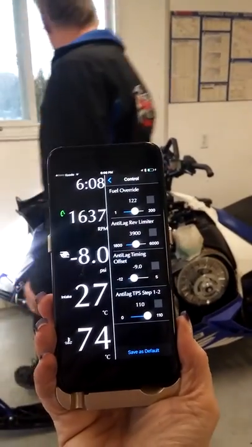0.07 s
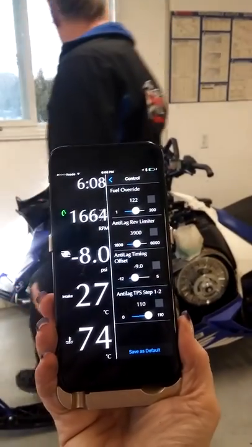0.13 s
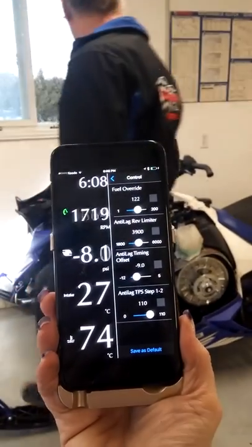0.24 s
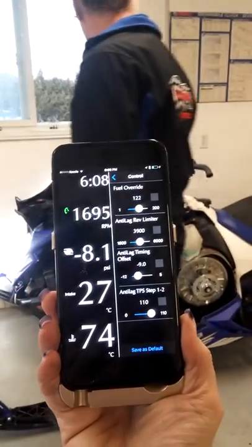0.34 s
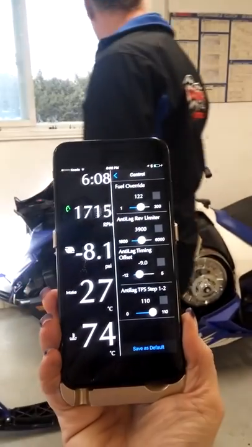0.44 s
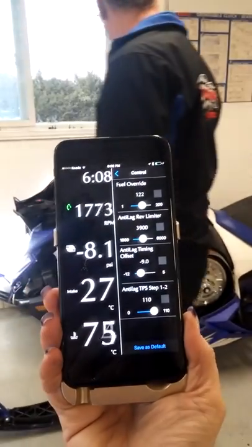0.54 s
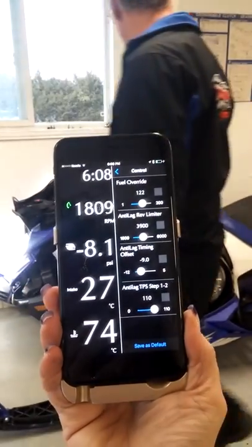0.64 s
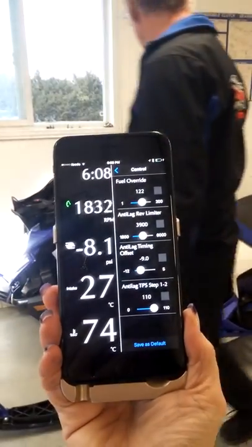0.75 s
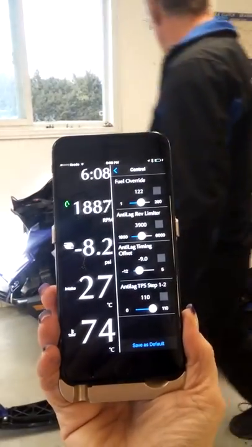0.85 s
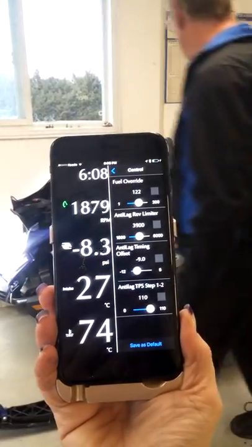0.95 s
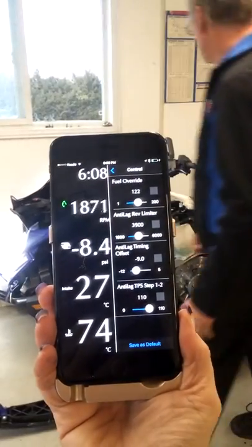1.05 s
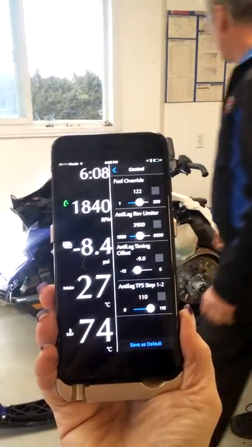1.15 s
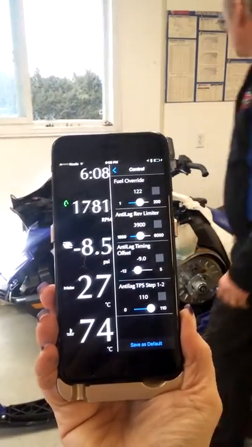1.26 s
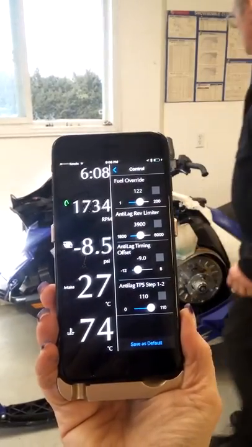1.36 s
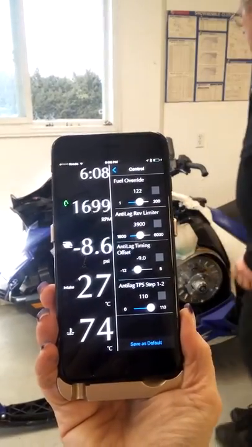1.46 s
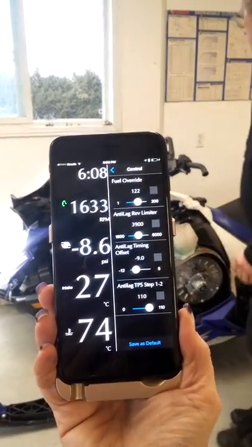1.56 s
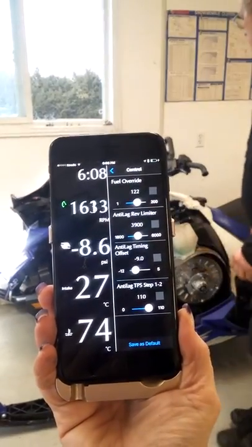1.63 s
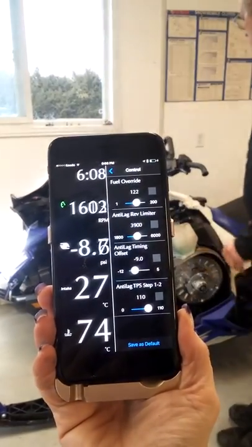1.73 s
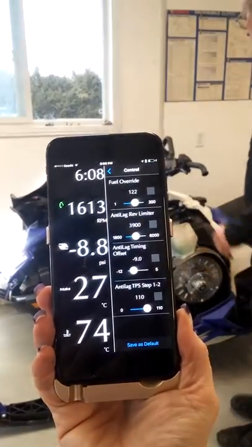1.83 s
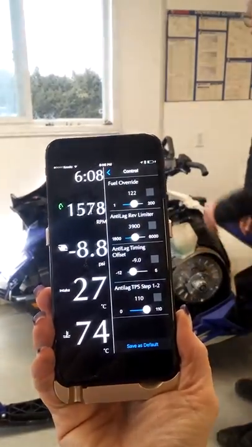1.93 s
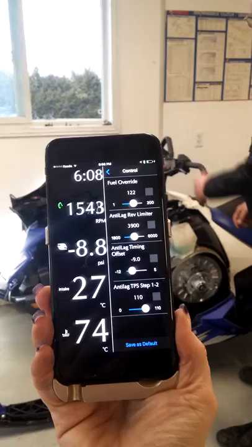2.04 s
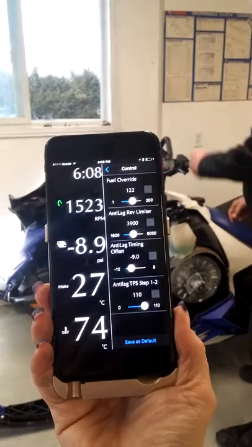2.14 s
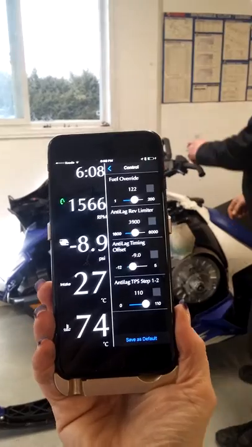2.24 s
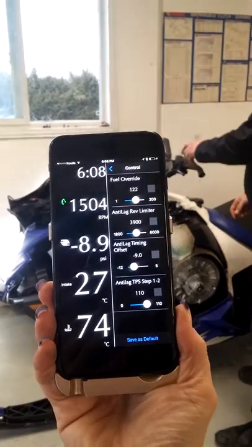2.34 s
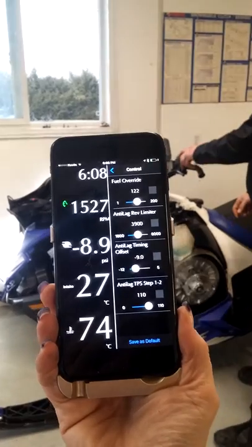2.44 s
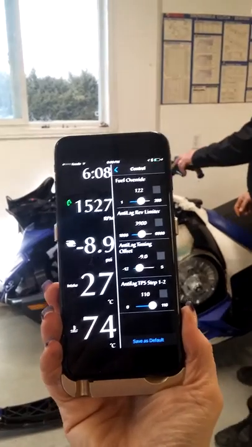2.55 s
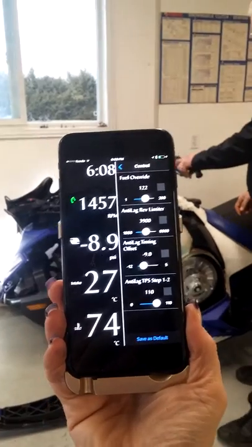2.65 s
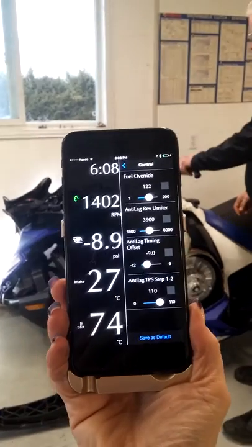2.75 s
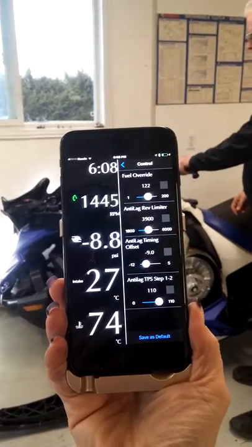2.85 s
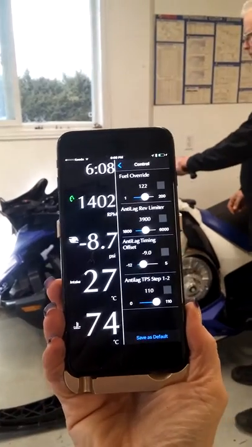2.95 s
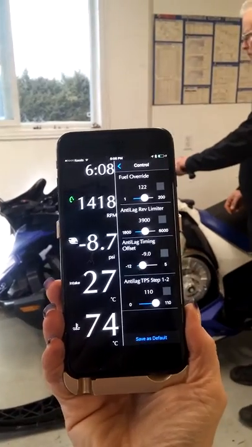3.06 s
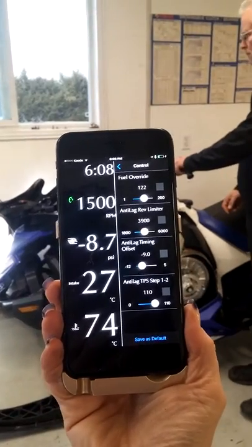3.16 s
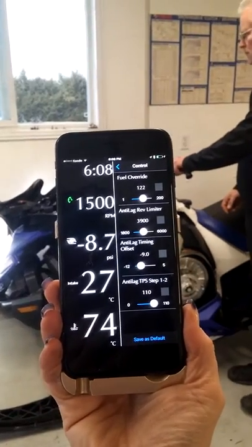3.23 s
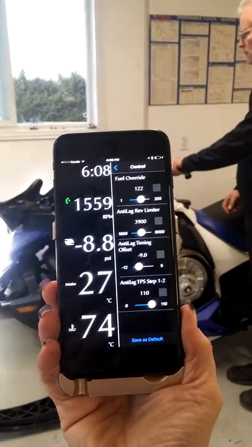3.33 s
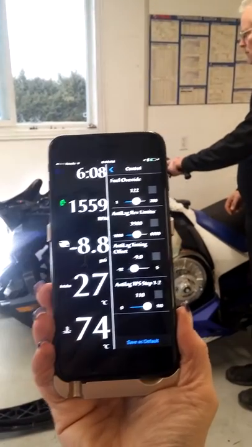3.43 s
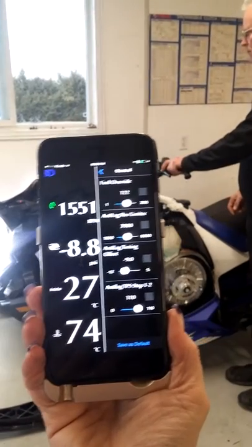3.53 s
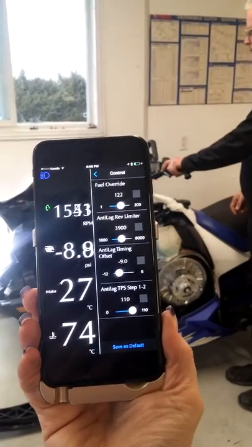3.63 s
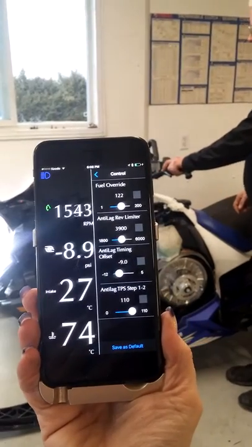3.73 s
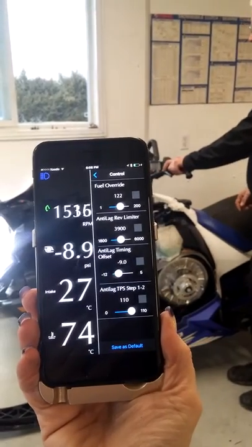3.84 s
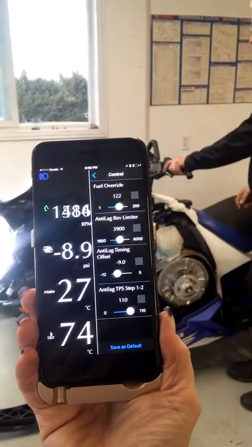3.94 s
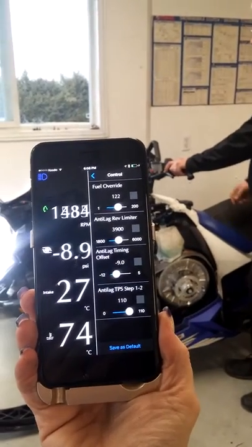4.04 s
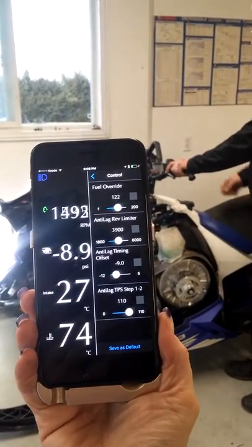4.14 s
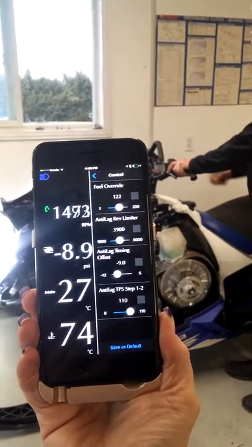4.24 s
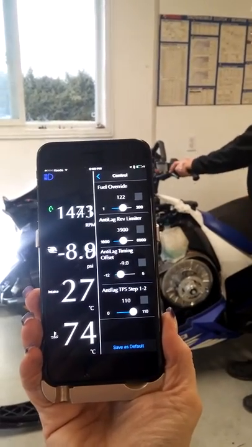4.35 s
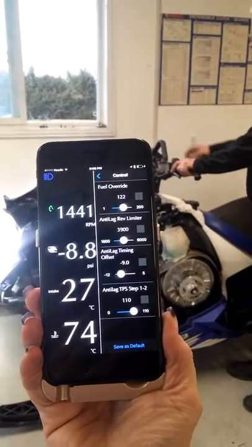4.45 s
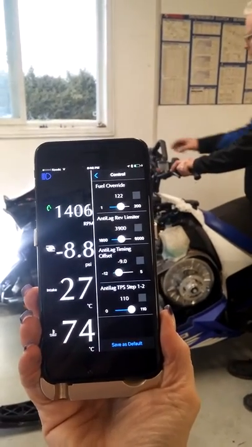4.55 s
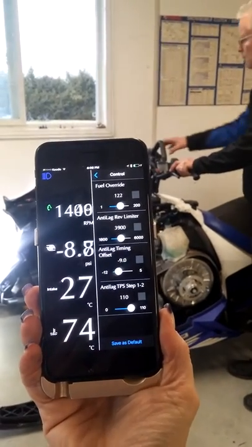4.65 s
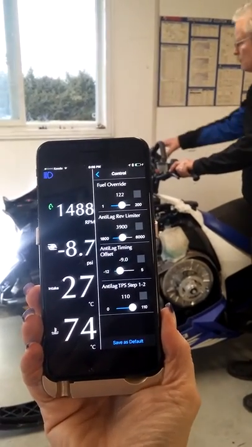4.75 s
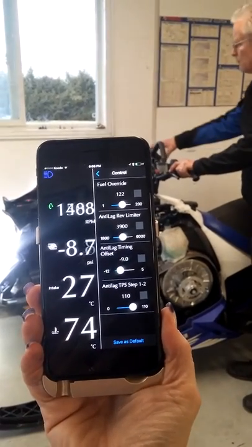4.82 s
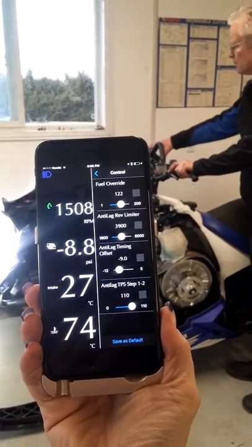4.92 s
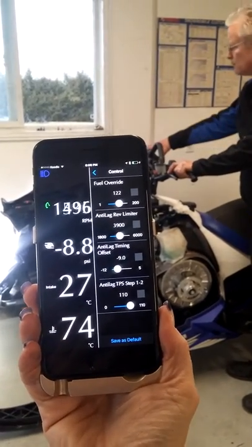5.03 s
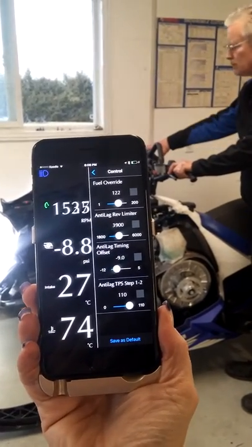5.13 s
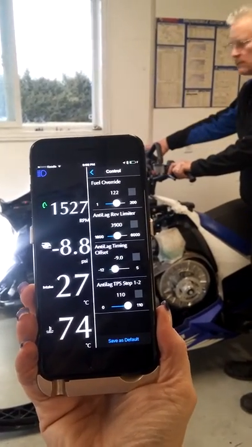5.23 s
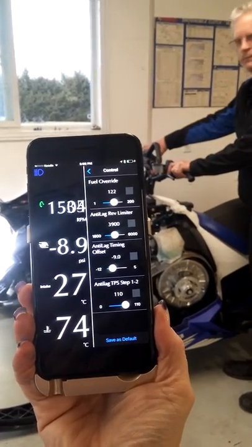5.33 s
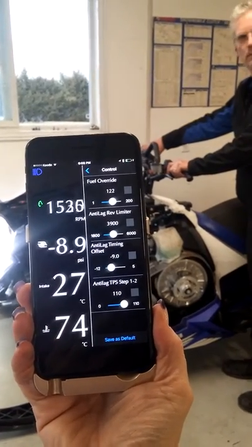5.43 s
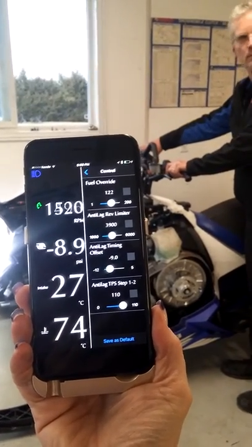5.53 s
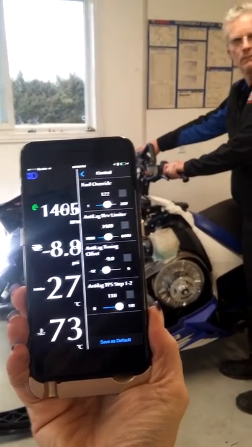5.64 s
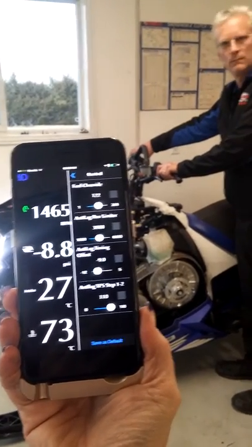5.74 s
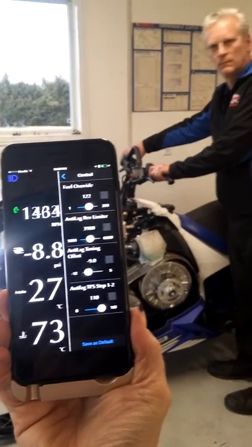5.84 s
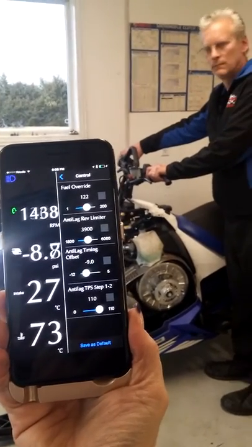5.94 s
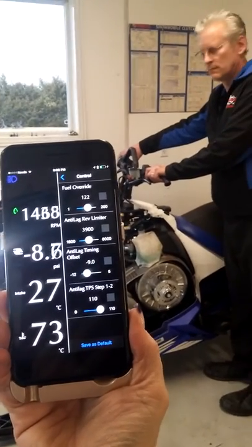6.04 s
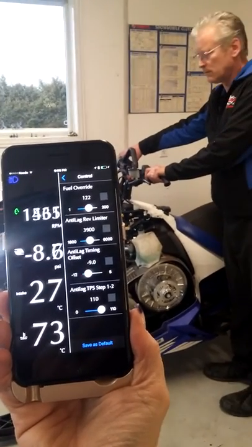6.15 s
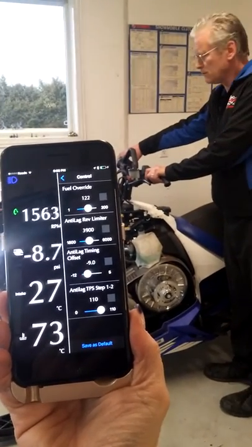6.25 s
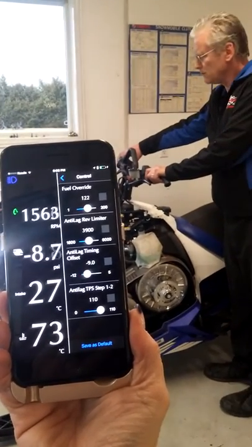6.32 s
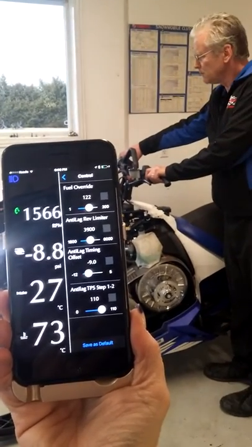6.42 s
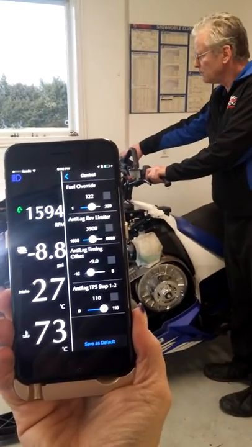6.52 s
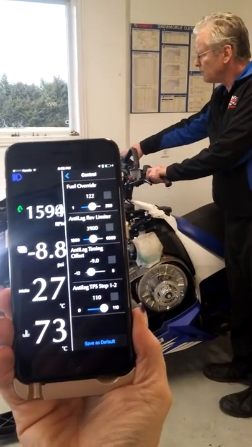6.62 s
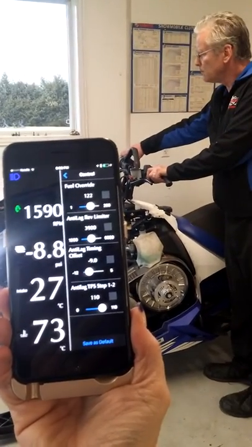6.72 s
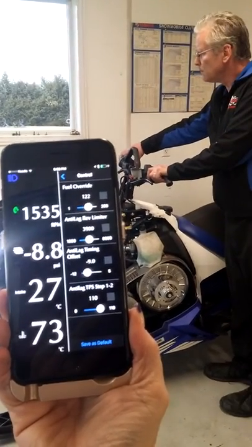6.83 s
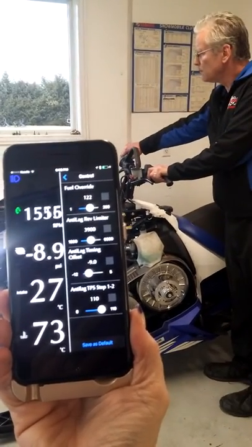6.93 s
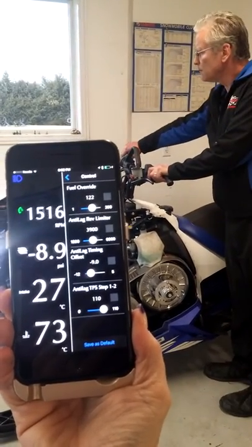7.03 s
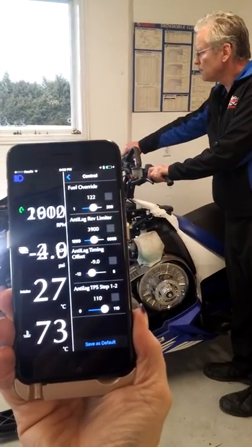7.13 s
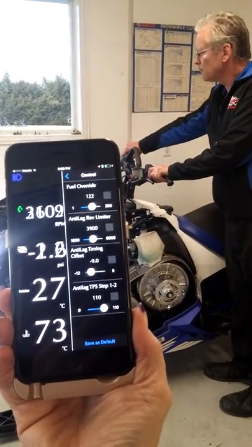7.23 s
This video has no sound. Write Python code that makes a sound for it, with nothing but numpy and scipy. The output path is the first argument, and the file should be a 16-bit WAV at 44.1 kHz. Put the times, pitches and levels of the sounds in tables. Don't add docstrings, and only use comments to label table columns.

```python
import sys
import numpy as np
from scipy import signal
from scipy.fft import rfft, irfft
from scipy.io import wavfile

SR = 44100
rng = np.random.default_rng(int(sys.argv[2]) if len(sys.argv) > 2 else 0)


def persist_wave(psi):
    counts = np.round(np.clip(psi, -1, 1) * 32767).astype(np.int16)
    wavfile.write(sys.argv[1], SR, np.atleast_2d(counts).T)


def how_loud(loudness_db):
    steps = np.asarray(loudness_db, float) / 20
    return 10 ** steps


N = 321048

# [t/s, level/dB]
PULSE_STRENGTH = [(0.0, -12), (0.5, -12), (0.95, -14), (1.2, -16), (1.45, -19), (2.1, -19), (2.4, -19.5),
                  (4.9, -20), (6.3, -20), (6.6, -21), (6.97, -19.5)]
CYLINDERS_DB = [0, .45, -.4]
# [t/s, f/Hz]
GOVERNOR_AIM = [(0.0, 41.06), (0.4, 42.83), (0.9, 47.0), (1.06, 46.84), (1.66, 40.04), (1.9, 39.87),
                (2.12, 38.28), (2.5, 38.22), (3.4, 38.87), (4.0, 37.8), (4.9, 37.6), (5.15, 38.16),
                (5.6, 37.98), (6.25, 38.92), (6.6, 39.98), (6.78, 38.8), (6.97, 38.4)]
# [f/Hz, level/dB]
BALANCE = [(60, 1.5), (110, 0.5), (200, 0.5), (380, -0.5), (700, 2), (1290, 1), (2380, -1.5), (4400, 1),
           (8120, -11), (15000, 3)]


def evened(x):
    return x / np.sqrt(np.mean(x ** 2) + 1e-20)


def read(points, hz):
    f, value = np.transpose(points)
    return np.interp(np.log(hz + 1), np.log(f + 1), value)


def curve(rows, t):
    s, *columns = np.transpose(rows)
    return [np.interp(t, s, c) for c in columns]


def bumps(modes, hz):
    return sum(db / (1 + (2 * (hz - f) / width) ** 2) for f, width, db in modes)


def causal(db, size=32768):
    log_gain = np.log(how_loud(np.maximum(db, -100)))
    full = np.concatenate([log_gain, log_gain[-2:0:-1]])
    return np.fft.ifft(np.exp(np.conj(signal.hilbert(full)))).real[:size]


def drift(rate_hz):
    t = np.arange(N) / SR
    coarse = t[::64]
    f = np.geomspace(rate_hz / 3, rate_hz, num=24)[:, None]
    waves = np.sin(2 * np.pi * (f * coarse + rng.random((24, 1)))) / np.sqrt(f)
    return np.interp(t, coarse, evened(waves.sum(0)))


def noise(db, size):
    # [f/Hz, correlation]
    likeness = [(60, .99), (300, 0.45), (500, 0.36), (650, 0.48), (1500, 0.4), (3200, 0.28), (4500, 0.067),
                (8000, 0.33), (15000, 0.14)]
    # [f/Hz, phase/rad]
    left_lead = [(0, -11.5), (520, -0.0), (1550, -2.5), (3190, 3.5), (3620, -2.5), (4390, 6), (5680, -4),
                 (6720, -2), (8010, -66.5), (8960, -17), (10300, -27.5), (12800, -28), (14300, -49),
                 (15200, -53.6)]
    frames, hz = N * 4 // size + 8, np.fft.rfftfreq(size, 1 / SR)
    a, b, c, d = rng.standard_normal((frames, len(hz), 4)).T
    same = np.clip(read(likeness, hz), -1, 1)[:, None]
    left = a + 1j * b
    delayed = left * np.exp(-1j * read(left_lead, hz))[:, None]
    z = np.array([left, same * delayed + np.sqrt(1 - same ** 2) * (c + 1j * d)])
    z *= how_loud(db(hz) + np.outer([.5, -.5], read(BALANCE, hz)))[:, :, None]
    return evened(signal.istft(z, nperseg=size, noverlap=size * 3 // 4)[1][:, :N])


def speed(t):
    # [start t/s, fall time/s, caught t/s, depth f/Hz]
    sags = [
        (2.5, 0.2498, 3.0, 2.8),
        (4.14, .26, 4.6, 2.1),
        (5.5, .4, 5.95, 3.7),
    ]
    recover_s, linger_hz_per_s = .25, 1.5
    hz = curve(GOVERNOR_AIM, t)[0]
    for s, fall_s, caught, depth_hz in sags:
        down = depth_hz * np.clip((t - s) / fall_s, 0, 1)
        down += linger_hz_per_s * np.clip(t - s - fall_s, 0, None)
        hz = hz - down * np.clip(1 - (t - caught) / recover_s, 0, 1)
    return hz


def firing():
    wobble_turns, wobble_hz = .015, 5.0
    t = np.arange(N) / SR
    return np.cumsum(speed(t)) / SR + 0.304 + wobble_turns * drift(wobble_hz)


def knocks():
    # [t/s, peak level/dB, f/Hz, t60/s]
    pushes = [
        (.56, -12, 49.5, 0.41),
        (3.96, -28, 52.25, 0.47),
    ]
    out, t = np.zeros(N), np.arange(SR // 2) / SR
    for s, db, hz, t60 in pushes:
        push = how_loud(db - 60 * t / t60) * np.sin(2 * np.pi * hz * t)
        out[round(s * SR):][:len(t)] += push * (1 - np.exp(-t / 0.023))
    return out


def rumble(below_db=-15):
    # [f/Hz, level/dB per Hz]
    flow_color = [(15, -49), (25, -20), (56, -30.5), (123, -2), (194, 27), (362, 10), (466, 14), (600, -21),
                  (780, -69), (1320, -120)]
    level_db = curve(PULSE_STRENGTH, np.arange(N) / SR)[0]
    return how_loud(level_db + below_db) * noise(lambda hz: read(flow_color, hz), size=4096)


def clatter(fired, throb=.45, cycle=.07, flicker_db=1.05, tick_db=3.3, mid_share=.25):
    # [t/s, level/dB]
    idle_level = [(0.0, -27), (0.43, -29.5), (0.97, -35.5), (1.95, -33.5), (5.3, -33.5), (5.75, -35.5),
                  (6.17, -32.5), (6.37, -37), (6.72, -40), (6.94, -36.5)]
    # [t/s, level/dB]
    stab_level = [(6.966, -40), (6.976, -27), (7.0, -25.5), (7.05, -29), (7.095, -30.5), (7.103, -24.5),
                  (7.174, -23.5), (7.28, -26)]
    # [f/Hz, level/dB per Hz]
    metal_color = [(260, -54), (450, -12), (632, -17), (1160, -7.5), (1410, -1.5), (1950, -19), (3080, -15),
                   (3410, -19), (4140, -17.5), (4800, -20), (9760, -23), (14300, -32), (15700, -39)]
    # [f/Hz, width/Hz, level/dB]
    panel_modes = [(638, 27, 4.5), (763, 60, 6.5), (820, 7.3, -13), (968, 13, 5), (1389, 29, 8.5),
                   (1615, 19, 7.5), (2126, 25, 7.5), (3078, 90, 9), (4210, 540, 2.5), (6960, 340, 5.5),
                   (9740, 1350, 5.5)]
    usual_db, open_db = -34.0, -4.0
    t = np.arange(N) / SR
    throttle_open = t > stab_level[0][0]
    level_db = curve(idle_level + stab_level, t)[0]
    shade_db = np.maximum(usual_db - level_db, 0)
    block_db = 2.7 + .7 * shade_db + open_db * throttle_open

    hz = np.fft.rfftfreq(N, 1 / SR)
    wide = rfft(noise(lambda hz: read(metal_color, hz) + bumps(panel_modes, hz), size=2048))
    bands_hz = [(0, 1900), (1900, 3600), (3600, 6300), (6300, SR)]
    block, mid, high, top = (irfft(wide * (hz >= lo) * (hz < hi), N) for lo, hi in bands_hz)
    top = top + how_loud(10.0) * throttle_open * irfft(wide * (hz >= 14800), N)

    ticks = how_loud(tick_db * np.minimum(rng.exponential(1, N), 4.0)) * (rng.random(N) < 350 / SR)
    ticks = np.sqrt(signal.lfilter([1], [1, -np.exp(-1 / (.002 * SR))], ticks ** 2) + 4)
    beat = 1 + throb * np.exp(-((fired + .4) % 1) / .3)
    beat += cycle * np.cos(2 * np.pi * fired / len(CYLINDERS_DB))
    shared_db = flicker_db * drift(11.)
    lively = evened(ticks * beat * how_loud(shared_db))

    rattle = high * how_loud(-.5 * shade_db) * lively ** .75
    middle = mid * how_loud(open_db / 3 * throttle_open) * lively ** mid_share
    upper = evened(top * lively + rattle + middle)
    return how_loud(level_db) * (upper + how_loud(block_db + .3 * shared_db) * evened(block))


def bangs(tail_db=-12, tail_t60=0.13, sag=0.2):
    # [t/s, peak level/dB, ring f/Hz]
    late_firings = [(6.972, -19, 330), (6.996, -10.5, 312), (7.018, -6.5, 309), (7.037, -7, 237),
                    (7.061, -17, 332), (7.083, -24, 277), (7.101, -14, 310), (7.117, 0.5, 385),
                    (7.134, 0, 345), (7.151, 3, 325), (7.166, -0.5, 310), (7.182, -7, 285.4),
                    (7.197, 2.5, 340), (7.212, 3, 380), (7.226, 3, 354), (7.242, 2, 322), (7.254, 2.5, 301),
                    (7.269, -5, 330)]
    out, t = np.zeros(N), np.arange(6000) / SR
    rasp_band = signal.butter(2, [450, 1100], "band", fs=SR)
    rasp = signal.lfilter(*rasp_band, rng.standard_normal((len(late_firings), len(t))))
    rise = 1 - np.exp(-t / .003)
    for (s, db, hz), hiss in zip(late_firings, rasp):
        t60 = 0.05 - .001 * db
        thump_db = -14 - .3 * db
        turn = 2 * np.pi * np.cumsum(hz * (.98 - sag * np.tanh(t / 0.022))) / SR
        pipe_modes = np.sin(turn) + 0.22 * np.sin(1.594 * turn) + .3 * np.sin(.62 * turn)
        ring = pipe_modes * how_loud(-60 * t / t60)
        thump_turn = 2 * np.pi * np.cumsum(36 + 170 * np.exp(-t / 0.0099)) / SR
        thump = how_loud(thump_db - 60 * t / 0.13) * np.cos(thump_turn)
        crack = how_loud(-25 - 60 * t / .08) * evened(hiss)
        part = out[round(s * SR):][:len(t)]
        part += (how_loud(db + 8.0) * rise * (ring + thump + crack))[:len(part)]

    t = np.arange(SR // 2) / SR
    tail = rng.standard_normal((2, len(t))) * how_loud(-60 * t / tail_t60) * (t > .006)
    tail = tail[0] + .5 * tail[1] * np.array([[1], [-1]])
    tail = tail / np.linalg.norm(tail[0])
    wet = out + how_loud(tail_db) * signal.fftconvolve(out[None], tail, axes=1)[:, :N]
    return signal.lfilter(*signal.butter(1, 22, "high", fs=SR), wet)


def paths(late_s=.006, chamber_hz=170):
    # [f/Hz, level/dB]
    muffler_gain = [(25, -72.5), (37, -27), (47, -7.5), (60, 5.5), (70, 7), (110, 3.5), (140, 5.5),
                    (170, -4), (240, -5), (350, 2), (400, -3.5), (450, -19), (520, -28.5), (800, -54)]
    # [f/Hz, width/Hz, level/dB]
    room_modes = [(71.6, 7.7, 7), (86, 5.9, -2), (96, 7.9, 7.5), (108, 17, -1), (114.47, 4.9, 6.5),
                  (140.2, 12.3, 9.5), (153.7, 5.6, -5.5), (177.9, 2.3, -36), (218.5, 2.7, -19),
                  (209.5, 8.4, 0), (234, 30, 8.5), (252.1, 3.7, -17.5), (275, 8.2, 4), (295.3, 3.3, -4.5),
                  (306.4, 2.13, -23), (332, 37, 3.5), (340.4, 5.7, -9.5), (350.6, 7.5, 4),
                  (362.3, 3.7, -11), (410.1, 10.1, -29), (431.7, 25, 8.5), (444.6, 7.3, -26)]
    hz = np.fft.rfftfreq(65536, 1 / SR)
    way = np.array([causal(read(muffler_gain, hz) + bumps(room_modes, hz * shift) + side * read(BALANCE, hz))
                    for shift, side in [(1, 1), (1.008, -0.91)]])
    low = 1 / (1 + (hz / chamber_hz) ** 8)
    late = np.exp(-2j * np.pi * np.cumsum(late_s * low + .05) * hz[1])
    late *= np.exp(-1j * (.7 + .6 * low))
    both = rfft(way / np.linalg.norm(way[0]), 65536) * late
    boom, bark = irfft(both * low), irfft(both * (1 - low))
    return boom[:, :32768], bark[:, :32768]


def exhaust(fired, rough_db=.5, jitter_s=.0001, stumble=.45):
    lead = SR // 2
    before = fired[0] - np.arange(lead, 0, -1) * GOVERNOR_AIM[0][1] / SR
    fired = np.concatenate([before, fired])
    at = np.flatnonzero(np.diff(np.floor(fired)))
    t = (at - lead) / SR
    luck = rng.standard_normal((len(at), 3))
    slow = np.maximum(38 - speed(t), 0)
    luck *= (1 + stumble * slow)[:, None]
    strength_db = curve(PULSE_STRENGTH, t)[0] - .5 * slow
    boom_db = -0.77 * np.maximum(speed(t) - 40.7, 0)
    boom_db += .45 * luck[:, 2] - 2.5 * np.clip(2 - 2 * t / .6, 0, 1)
    db = strength_db + np.resize(CYLINDERS_DB, len(at)) + rough_db * luck[:, 0]
    at = np.clip(at + (jitter_s * SR * luck[:, 1]).astype(int), 0, len(fired) - 1)
    out = 0
    for way, extra_db in zip(paths(), (boom_db, 0)):
        train = np.zeros(len(fired))
        train[at] = how_loud(db + extra_db + 36.0)
        out = out + signal.fftconvolve(train[None], way, axes=1)[:, lead + SR // 20:]
    return out[:, :N]


def scene():
    fired = firing()
    return knocks() + rumble() + clatter(fired) + bangs() + exhaust(fired)


def band_limit(x):
    return signal.sosfilt(signal.butter(12, 15590, fs=SR, output="sos"), x)


def record(dry):
    # [t/s, level/dB]
    headroom = [
        (0, 3.5),
        (1.2, 3.5),
        (1.5, 0),
        (7.28, 0),
    ]
    knee = 4.0
    ceiling = .75 * how_loud(curve(headroom, np.arange(N) / SR)[0])
    held = dry / (1 + abs(dry / ceiling) ** knee) ** (1 / knee)
    held = signal.sosfilt(signal.butter(6, 14400, fs=SR, output="sos"), held)
    return band_limit(held)


dry = scene()
out = record(dry)
persist_wave(out)
```